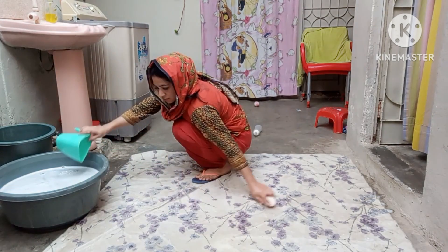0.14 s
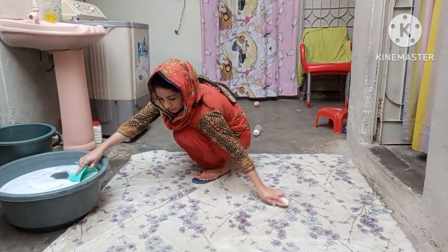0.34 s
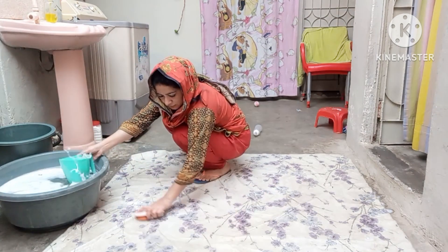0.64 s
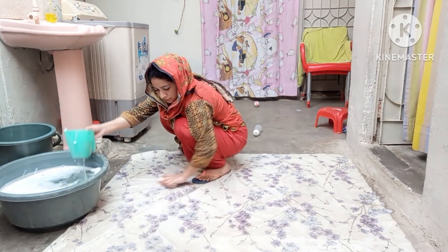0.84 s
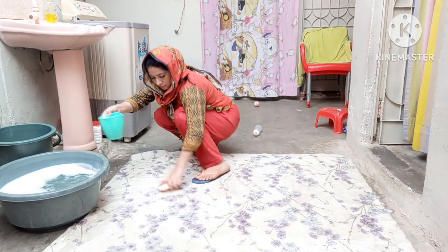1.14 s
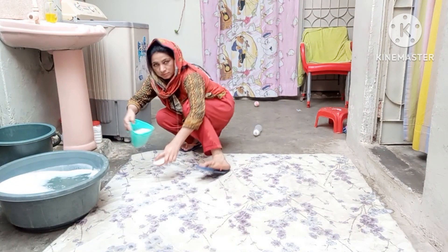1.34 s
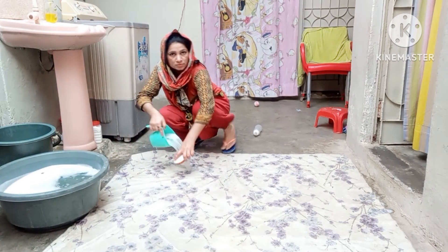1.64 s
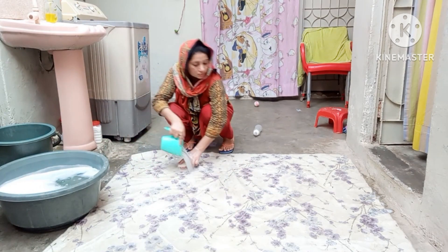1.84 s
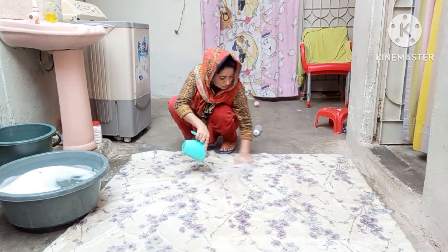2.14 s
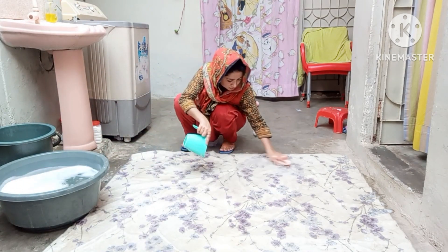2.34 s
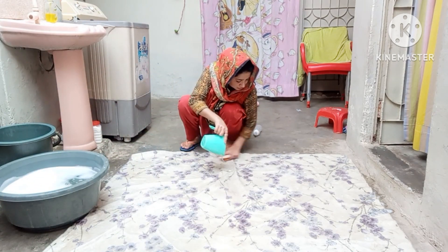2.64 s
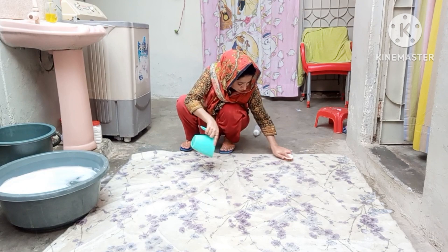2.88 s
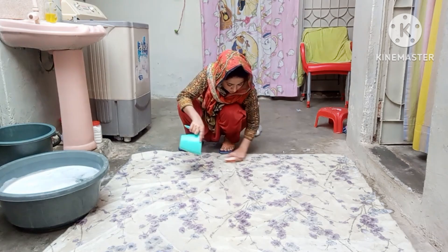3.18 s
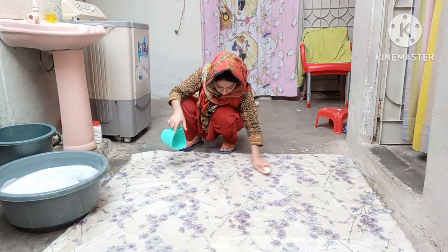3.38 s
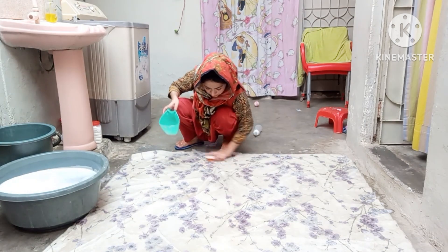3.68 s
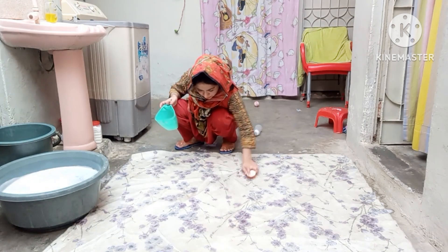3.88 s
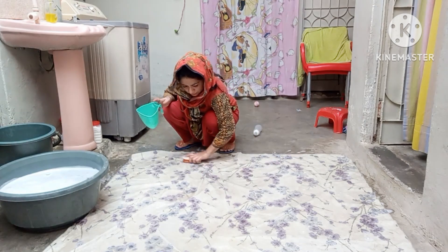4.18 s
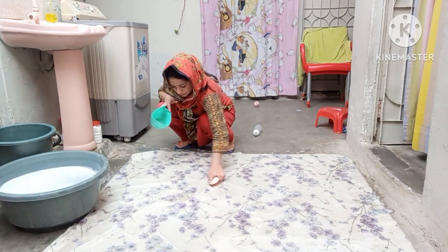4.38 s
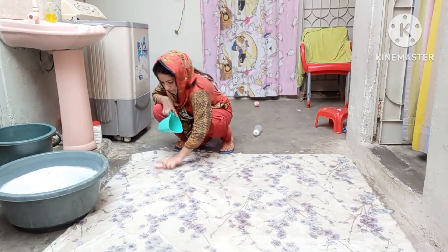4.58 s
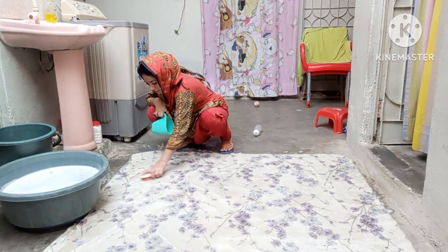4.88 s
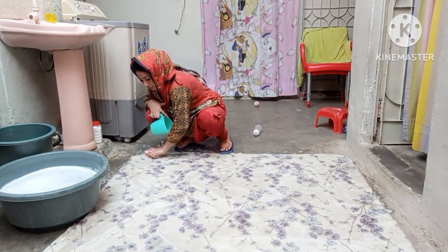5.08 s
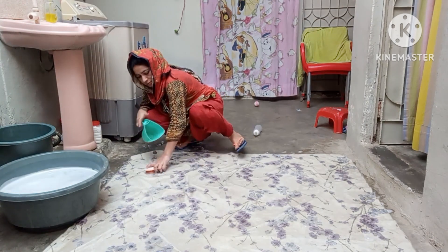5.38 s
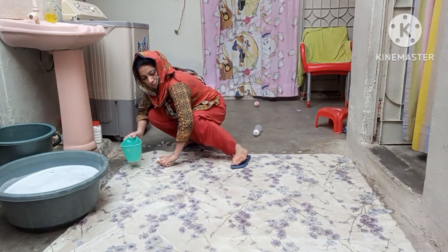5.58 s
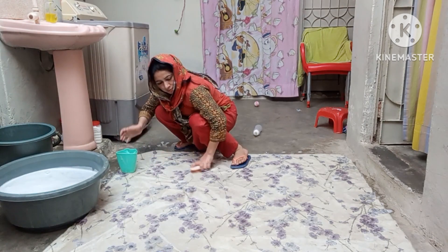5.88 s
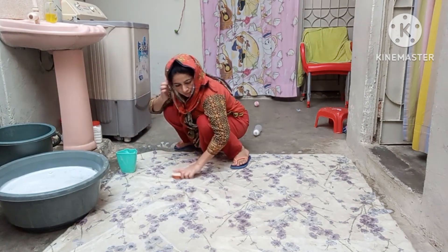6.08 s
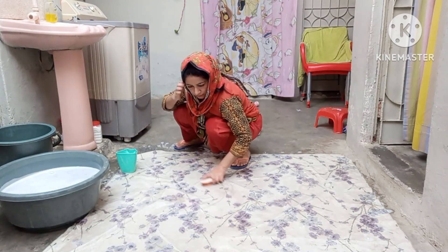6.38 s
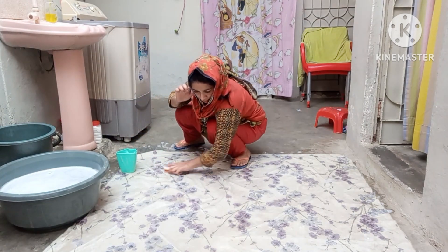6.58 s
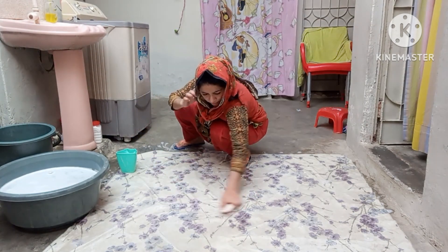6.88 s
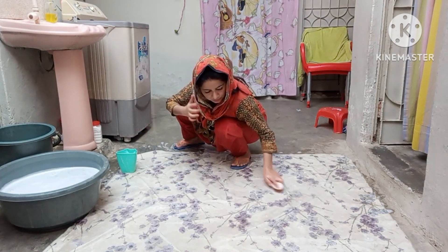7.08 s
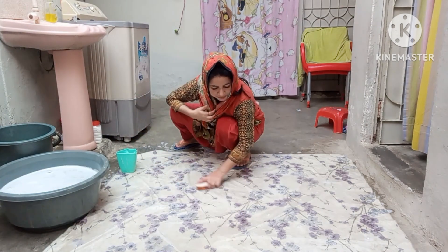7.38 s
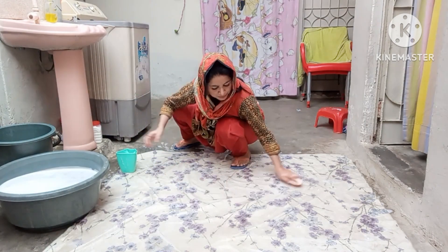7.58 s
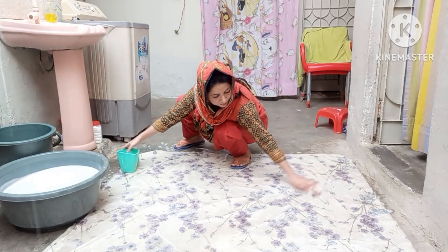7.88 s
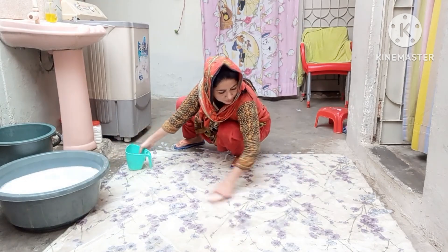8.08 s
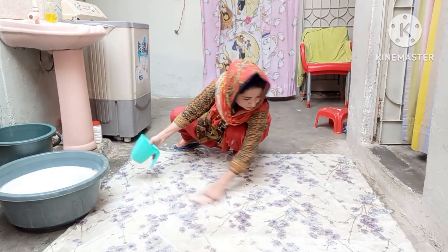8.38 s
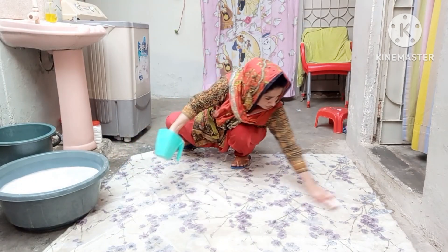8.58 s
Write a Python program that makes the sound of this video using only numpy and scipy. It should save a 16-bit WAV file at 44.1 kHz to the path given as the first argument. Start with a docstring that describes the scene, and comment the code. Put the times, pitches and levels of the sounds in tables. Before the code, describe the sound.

Brisk wet back-and-forth brushing on a sudsy plastic sheet, with a scoop of water, a hollow mug knock and constant low humming.

```python
"""A small hard-walled room, where a hand brush scrubs a wet, soapy plastic sheet, about four strokes a second.
Each stroke speeds up and slows to the turn, driving filtered random flicks of bristles, fizz of foam and rasp.
A plastic mug scoops water, heard as rising decaying sines; later it knocks hollowly with a few ringing modes.
The brush nearly stops once among a few sharp taps, made of short sine cracks and wet spatter.
A motor hums throughout, as wavering sines over a dull rush of air; one microphone hears it all."""
import sys
import numpy as np
from scipy import signal
from scipy.fft import rfft, irfft, next_fast_len
from scipy.io import wavfile
from scipy.ndimage import uniform_filter1d

SR = 44100
rng = np.random.default_rng(int(sys.argv[2]) if len(sys.argv) > 2 else 0)


def unload_audio(sound):
    """Save the sound as a 16-bit wav file, at the path given as the first command line argument."""
    columns = np.transpose(np.atleast_2d(sound))
    # keep every value between -1 and 1, then stretch to whole-number steps
    steps = np.round(np.clip(columns, -1, 1) * 32767)
    wavfile.write(sys.argv[1], SR, steps.astype(np.int16))


N = 384993
TIME = np.arange(N) / SR  # seconds


def undb(db):
    """Decibels to gain."""
    return 10 ** (np.asarray(db) / 20)


def unit(x):
    """Scale to rms 1."""
    return x / np.sqrt(np.mean(x ** 2))


def colour(x, points):
    """Filter by a spectrum of (Hz, dB) points, joined by straight lines over log frequency."""
    hz, db = np.transpose(points)
    size = next_fast_len(N + 4096)
    f = np.maximum(np.fft.rfftfreq(size, 1 / SR), 1)
    gain = undb(np.interp(np.log(f), np.log(hz), db))
    return irfft(rfft(x, size) * gain, size)[:N]


def band(x, lo_hz, hi_hz, order=2):
    """Band-pass."""
    edges = [lo_hz, min(hi_hz, SR / 2 - 100)]
    return signal.sosfilt(signal.butter(order, edges, "band", fs=SR, output="sos"), x)


def walk(rate):
    """Smooth random drift with rate new values a second, rms 1."""
    k = max(int(SR / rate), 1)
    steps = np.repeat(rng.standard_normal(N // k + 1), k)[:N]
    return unit(uniform_filter1d(steps, k))


def add(out, s, sound):
    """Mix a short sound in at time s."""
    i = int(s * SR)
    out[i:i + len(sound)] += sound[:N - i]


def fade(t, t60):
    """Exponential decay, down 60 dB after t60 seconds."""
    return np.exp(-np.log(1000) * t / t60)


def swell(s, length):
    """A smooth rise and fall, length seconds in all, around time s."""
    return np.cos(np.pi * np.clip((TIME - s) / length, -.5, .5))


def flicks(per_s, scatter_db):
    """Random tiny clicks of uneven size, with steady mean power whatever their rate."""
    share = np.clip(per_s / SR, 1e-4, 1)
    size = rng.standard_normal(N) * undb(scatter_db * rng.standard_normal(N))
    return unit((rng.random(N) < share) * size / np.sqrt(share))


def room(x, wet_db):
    """Direct sound plus the dense echoes of close bare walls; the treble dies sooner."""
    low_t60, high_t60 = 0.45, 0.25  # s
    t = TIME[:SR // 2]
    low = signal.sosfilt(signal.butter(2, 2000, fs=SR, output="sos"), rng.standard_normal(len(t)))
    high = signal.sosfilt(signal.butter(2, 2000, "high", fs=SR, output="sos"), rng.standard_normal(len(t)))
    tail = low * fade(t, low_t60) + high * fade(t, high_t60)
    tail = tail * np.clip(t / 0.0011, 0, 1)  # echoes build up over 1.1 ms
    return x + undb(wet_db) * signal.fftconvolve(x, tail / np.linalg.norm(tail))[:N]


def moving_room(x, wet_db, places_per_s=17, count=13):
    """The echo pattern changes as the hand moves from place to place, round a cycle of places."""
    place = TIME * places_per_s
    out = x
    for k in range(count):
        away = abs((place - k + count / 2) % count - count / 2)
        here = x * np.sqrt(np.clip(1 - away, 0, 1))  # equal-power share of this place
        out = out + room(here, wet_db) - here  # echoes only
    return out


def motor(waver=0.13, flutter_db=1.0):
    """Slightly wavering hum lines over a soft, dull rush of air."""
    # Motor and mains lines. Each row: frequency in Hz, mean level in dB rms.
    hum_lines = [(69.5, -67), (86, -62.5), (100.4, -46), (138.8, -50), (162.6, -45), (200.5, -63.5),
                 (208.5, -60.5), (324, -55), (533, -56), (573, -61), (601, -61), (700, -59), (796, -61),
                 (897, -60.5)]
    # Spectrum of the motor's rush in the room. Each row: frequency in Hz, relative level in dB.
    rush_spectrum = [(25, -25), (45, -9), (85, 0), (150, 6.5), (250, -5.5), (350, -2), (600, -6), (900, -9),
                     (1300, -17), (3000, -20), (6000, -29), (15000, -36)]
    lines = 0
    for hz, db in hum_lines:
        phase = 2 * np.pi * (hz * TIME + rng.random()) + waver * walk(4)  # waver in radians
        lines = lines + undb(db + flutter_db * walk(5)) * np.sqrt(2) * np.sin(phase)
    rush = unit(colour(rng.standard_normal(N), rush_spectrum))
    air = undb(-43.5 + 1.0 * walk(8)) * rush
    return band(lines + air, 28, 8400)


def foam():
    """Suds bursting by themselves crackle faintly all the time."""
    return undb(-66) * unit(band(flicks(900, 2.7), 3000, 15000))


def stroke_speed(done, rise):
    """The hand speeds up from rest and slows to the turn in one arch; done is the share of the stroke gone by."""
    return np.sin(np.pi * np.interp(done, [0, np.clip(rise, .05, .95), 1], [0, .5, 1]))


def scrubbing():
    """Gains of bristle tips, swish, fizz and rasp: every stroke drives all four by its speed."""
    # Strokes of the brush. Each row: start in seconds, length in seconds, share of the length spent speeding up,
    # bristle level at full speed in dB, then swish, foam fizz and pressed-sheet rasp relative to it in dB,
    # growth of the rasp from start to end in dB (positive: the hand presses down, negative: it lifts).
    strokes = [(-0.2, 0.51, 0.34, -28.5, 0.5, 0, -9.5, -3), (0.329, 0.51, 0.43, -29, -3, -0.5, -10.5, -2),
               (0.592, 0.43, 0.57, -30, -2.5, -2.5, -7, 4),
               (0.934, 0.19, 0.51, -31.0, -1.0, -0.5, -8, -0.5), (1.128, 0.19, 0.43, -35.5, 0.5, 2, -4, -7),
               (1.318, 0.082, 0.41, -52, -5, -6, -8, 0), (1.501, 0.13, 0.099, -56.5, -8, -5, -4, 0),
               (1.712, 0.2, 0.6, -47.5, -1, -1, -8, 0), (1.86, 0.34, 0.4, -44.5, -5, -5, -8, 0),
               (2.018, 0.42, 0.62, -36, -4.5, -4.5, -6.5, -6), (2.386, 0.3, 0.54, -32.5, -3, -3, -8, 14),
               (2.675, 0.33, 0.35, -29.5, -1.5, -2.5, -12.5, -7),
               (2.954, 0.26, 0.51, -28, -1.0, -1, -12, 6.5), (3.2, 0.24, 0.38, -28.5, -0.5, -1, -13.5, -5),
               (3.407, 0.322, 0.43, -29.0, -0.5, 0, -9.5, 8.5),
               (3.695, 0.28, 0.5, -28.5, -1.0, 0.5, -10.5, 0),
               (3.936, 0.3, 0.41, -29.0, -1.5, -1.0, -8, 6.5), (4.212, 0.23, 0.59, -29, -1, -0.5, -10, 4),
               (4.429, 0.34, 0.28, -30.0, 0, -0.5, -6, 2), (4.741, 0.21, 0.45, -30.5, -2.5, -2.5, -11, -7),
               (4.916, 0.32, 0.41, -29, -0.5, -1.5, -8, -2), (5.181, 0.22, 0.64, -31, 2, 2, -11.5, 1),
               (5.401, 0.24, 0.41, -32.5, -2, -1.0, -8.5, 8),
               (5.606, 0.318, 0.42, -29.5, -1.0, 0.5, -10.0, 9),
               (5.891, 0.18, 0.44, -34.5, -0.5, -0.5, -10, 3), (6.042, 0.33, 0.55, -29, 0, 0, -9.5, 4),
               (6.347, 0.34, 0.32, -32.5, 0, 0.5, -6, 11), (6.543, 0.64, 0.46, -28.0, -1.0, -1, -9.5, -0.5),
               (7.072, 0.14, 0.59, -35.5, -1, 1, -11, 2), (7.18, 0.21, 0.25, -31.5, -1, 0.5, -8.5, 12),
               (7.317, 0.51, 0.39, -28.5, -1.0, -0.5, -12.5, 2.5),
               (7.797, 0.32, 0.41, -29, -2, -0.5, -11.0, 2), (7.975, 0.36, 0.44, -30, 0.5, 0, -6.5, 5),
               (8.32, 0.31, 0.67, -27.5, 1.5, 5, -9.5, -6), (8.549, 0.36, 0.36, -28.5, 1.5, 2, -13.5, 4)]
    # gain grows as speed to this power: foam needs a fast brush, the sheet rasps even under a slow one
    tips_power, swish_power, fizz_power, rasp_power = 0.9, 0.99, 1.15, 0.56
    energy = np.zeros((4, N))
    for start, length, rise, db, swish_db, fizz_db, rasp_db, press_db in strokes:
        on = slice(*np.searchsorted(TIME, [start, start + length]))
        done = (TIME[on] - start) / length
        speed = stroke_speed(done, rise)
        pressed_db = rasp_db + press_db * (done - .5)
        laws = [(0, tips_power), (swish_db, swish_power), (fizz_db, fizz_power), (pressed_db, rasp_power)]
        for k, (above_db, power) in enumerate(laws):
            energy[k, on] += (undb(db + above_db) * speed ** power) ** 2  # overlapping strokes add in power
    return np.sqrt(energy)


def bristle_band(per_s, lo_hz, hi_hz, scatter_db):
    """One register of the crowd of flicking bristles, rms 1."""
    # Colour of the bristles on the wet sheet. Each row: frequency in Hz, relative level in dB.
    bristle_spectrum = [(900, -4.5), (1200, -9), (1750, -5.5), (2700, -2.5), (3700, 0.5), (5000, -0.5),
                        (6500, -3), (10000, -8), (15000, -10)]
    return unit(band(colour(flicks(per_s, scatter_db), bristle_spectrum), lo_hz, hi_hz, order=4))


def brush():
    """Bristle tips catch and flick, more densely with effort; foam fizzes and the pressed sheet rasps."""
    # Moments when the bite of the bristles shifts, mostly harder.
    # Each row: middle in seconds, length in seconds, change at the middle in dB (halved for the fizz).
    bites = [(0.072, 0.18, 2.5), (0.86, .08, 3), (2.6, .06, 2), (3.313, .06, 2), (3.56, .07, 2.5),
             (4.022, .07, 2.5), (5.047, .07, 1.5), (6.24, .08, 3), (6.478, .08, 4), (6.954, .07, 2.5),
             (4.384, .05, 2), (5.347, .06, 0), (7.515, .06, 1), (7.9, .06, -0.5)]
    # wet and dry patches shift each register's level: spread in dB, changes per second
    patch_db, fizz_patch_db, patches_per_s = 0.47, 1.0, 20
    tips_gain, swish_gain, fizz_gain, rasp_gain = scrubbing()
    effort = tips_gain / tips_gain.max()
    flicks_per_s = 3000 + 26000 * effort
    bite_db = sum(db * swell(s, length) for s, length, db in bites)

    # the wet sheet grips unevenly, in slow surges and quick catches
    surge_db, catch_db = 0.64 * walk(28), 0.5 * walk(300)
    grip = undb(surge_db + catch_db)

    tips_gain = tips_gain * undb(bite_db + patch_db * walk(patches_per_s))
    tips = tips_gain * bristle_band(flicks_per_s, 2290, 4350, scatter_db=0.7)
    swish_gain = swish_gain * undb(bite_db + patch_db * walk(patches_per_s))
    swish = swish_gain * bristle_band(flicks_per_s, 4350, 6930, scatter_db=0.5)
    fizz_gain = fizz_gain * undb(bite_db / 2 + fizz_patch_db * walk(patches_per_s))
    fizz = fizz_gain * bristle_band(flicks_per_s, 7080, 15400, scatter_db=0.2)
    rasp_gain = rasp_gain * undb(1.174 * walk(35))
    rasp = rasp_gain * bristle_band(1200 + 5000 * effort, 1100, 2246, scatter_db=1.5)

    # the dull drag of the block on the film grows only slowly with effort
    drag = undb(-47) * effort ** 0.4 * unit(band(flicks(1500, 1.4), 560, 1380, order=3))
    return grip * (tips + swish + fizz + rasp) + drag


def chatter(width_hz=260, wander=0.044):
    """Stiff tufts slipping in step make a narrow, wavering rasp that swells and fades."""
    # Chatter of the tufts. Each row: middle in seconds, length in seconds, mean pitch in Hz,
    # gain at the middle in dB.
    tuft_chatters = [(0.077, 0.096, 3690, -29), (0.632, 0.091, 3600, -27), (5.086, 0.099, 3830, -31.5),
                     (7.913, 0.17, 3690, -34), (7.9, 0.067, 5330, -31), (8.668, 0.21, 3800, -25.5)]
    slip = unit(band(rng.standard_normal(N), 3.6, width_hz))
    clock = np.cumsum(1 + wander * walk(50)) / SR  # seconds that run unevenly, so the pitch wavers
    tones = sum(undb(db) * swell(s, length) * np.sin(2 * np.pi * hz * clock)
                for s, length, hz, db in tuft_chatters)
    return slip * tones


def taps(body_hz=1200, body_t60=0.00065, body_db=-8, edge_db=-9, edge_t60=0.0008, spatter_t60=0.059, gain_db=-1):
    """Each tap of wet plastic is a hard edge and a brief ringing crack over a duller body, then a wet spatter."""
    # Sharp taps. Each row: start in seconds, level in dB before gain_db, ring in Hz, ring t60 in seconds,
    # spatter relative to the crack in dB before it is halved.
    tap_hits = [(0.318, -23, 2400, 0.0036, -5), (1.358, -28, 3000, .002, -4), (1.379, -32, 9500, .001, -8),
                (1.5208, -23.5, 3400, .006, -4.5), (1.708, -20, 2700, 0.0043, -18),
                (1.724, -28, 9500, .001, -9), (1.739, -24, 1200, .005, -9), (1.769, -26, 3300, .002, -2),
                (1.7774, -8.5, 3080, .003, -13), (1.7784, 1, 3970, 0.0016, -19),
                (1.9892, -25, 4100, .008, -4), (8.115, -11, 1500, .002, -10), (8.154, -14, 3400, .002, 1),
                (8.2, -18, 1700, .004, 3)]
    out, t = np.zeros(N), TIME[:SR // 8]
    for s, db, hz, ring_t60, spatter_db in tap_hits:
        edge = np.sin(2 * np.pi * 12500 * t) * fade(t, edge_t60)
        crack = np.sin(2 * np.pi * hz * t) * fade(t, ring_t60)
        body = np.sin(2 * np.pi * body_hz * t) * fade(t, body_t60)
        drops = rng.standard_normal(len(t)) * undb(4.1 * rng.standard_normal(len(t)))
        spatter = unit(band(drops, 1100, 5300, order=1)) * fade(t, spatter_t60) / 2
        tap = crack + undb(edge_db) * edge + undb(body_db) * body + undb(spatter_db) * spatter
        add(out, s, undb(db + gain_db) * tap)
    return band(out, 560, 16000)


def scoop(rise=0.071, splash_db=-41):
    """Trapped air rings briefly, rising in pitch as it nears the surface; the first plunge also splashes."""
    # Air pockets gulped as the mug dips into the tub and later pours.
    # Each row: start in seconds, starting pitch in Hz, level in dB, cycles of that pitch in the 60 dB decay.
    gulps = [(0.4312, 385, -20, 12), (0.434, 560, -27, 13), (0.438, 960, -29.5, 21),
             (0.448, 480, -22.5, 16), (0.457, 670, -29, 22), (0.464, 1050, -29, 27), (0.483, 397, -32, 18),
             (0.507, 514, -29, 24), (0.552, 490, -34, 20), (0.574, 375, -33, 12), (1.895, 420, -39.5, 170)]
    out, t = np.zeros(N), TIME[:SR // 3]
    for s, hz, db, cycles in gulps:
        life = cycles / hz
        phase = 2 * np.pi * hz * t * (1 + rise * t / life / 2)  # pitch up by the share rise over one life
        add(out, s, undb(db) * np.sin(phase) * fade(t, life))
    splash = undb(splash_db) * swell(0.45, 0.054) * unit(band(flicks(1130, 2.5), 550, 1100))
    return band(out + splash, 180, 2500)


def folds():
    """Wrinkles slip under the brush block with a low crumple."""
    # Bumps over folds. Each row: middle in seconds, length in seconds, level at the middle in dB.
    fold_bumps = [(1.914, 0.087, -52), (3.573, 0.12, -39), (4.334, 0.04, -49), (4.533, 0.092, -43),
                  (6.245, 0.052, -40), (6.893, 0.29, -39), (8.18, 0.13, -40.5), (8.53, 0.12, -37.5)]
    crumple = unit(band(flicks(450, 2.0), 520, 1570))
    return crumple * sum(undb(db) * swell(s, length) for s, length, db in fold_bumps)


def mug(contact_s=0.0012, gain_db=-11):
    """The mug lands softly on the wet sheet and rocks; each contact tunes its hollow a little differently."""
    # Hollow knocks of the mug. Each row: start in seconds, level in dB before gain_db, pitch ratio.
    mug_knocks = [(5.8226, 2.5, 0.99), (5.8432, -3.5, 0.95), (5.851, -4, 1.01), (5.862, -6.5, 1),
                  (8.154, -14, 1.0)]
    # Modes of the mug. Each row: frequency in Hz before the pitch ratio, relative level in dB, t60 in seconds.
    mug_modes = [(452, -17, .04), (540, -11, .045), (642, 0, .06), (700, -9, .05), (900, -13, .05)]
    out, t = np.zeros(N), TIME[:SR // 3]
    for s, db, pitch in mug_knocks:
        ring = sum(undb(mode_db) * np.sin(2 * np.pi * hz * pitch * t) * fade(t, t60)
                   for hz, mode_db, t60 in mug_modes)
        soft_onset = 1 - np.exp(-t / contact_s)
        add(out, s, undb(db + gain_db) * ring * soft_onset)
    return band(out, 440, 1200)


def scene():
    """Everything sounds in the same small room; both channels are alike."""
    scrub = moving_room(brush() + chatter() + folds() + foam(), wet_db=-6.5)
    knocks = room(taps(), wet_db=-3.0) + room(mug(), wet_db=-12.5)
    water = room(scoop(), wet_db=-4.0)
    mono = scrub + knocks + water + motor()
    return np.array([mono, mono])


def record(dry):
    """The small microphone port colours the treble and a steep low-pass cuts the top."""
    # Treble response of the port. Each row: frequency in Hz, gain in dB.
    port_response = [(6500, 0), (8000, -9.5), (8800, -8), (9900, -1.5), (11000, -8), (12400, -15),
                     (13600, -22), (14800, -7), (15500, -8)]
    top_hz = 15550
    heard = np.array([colour(channel, port_response) for channel in dry])
    return signal.sosfilt(signal.ellip(10, .2, 80, top_hz, fs=SR, output="sos"), heard)


dry = scene()
out = record(dry)
unload_audio(out)
```